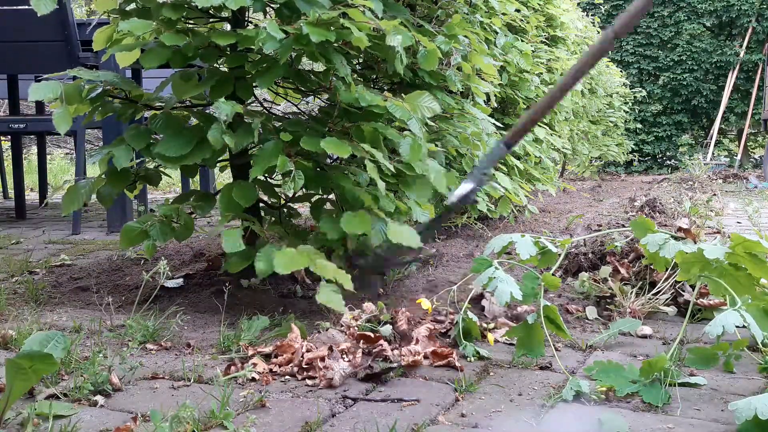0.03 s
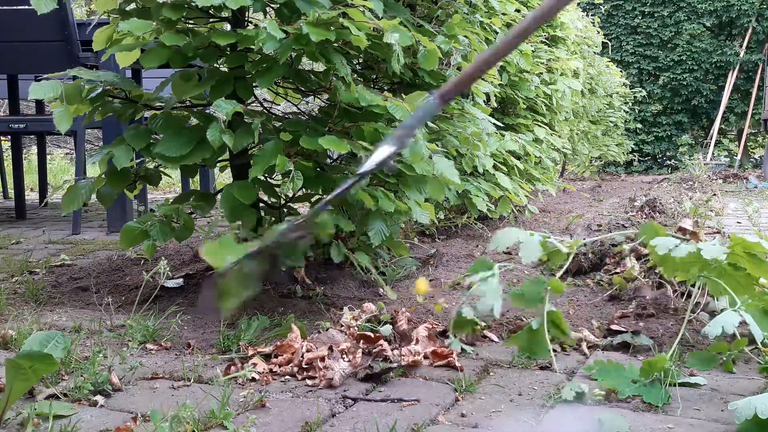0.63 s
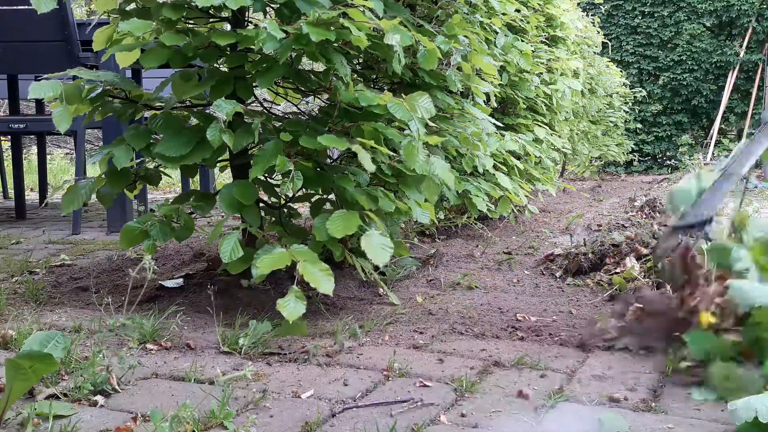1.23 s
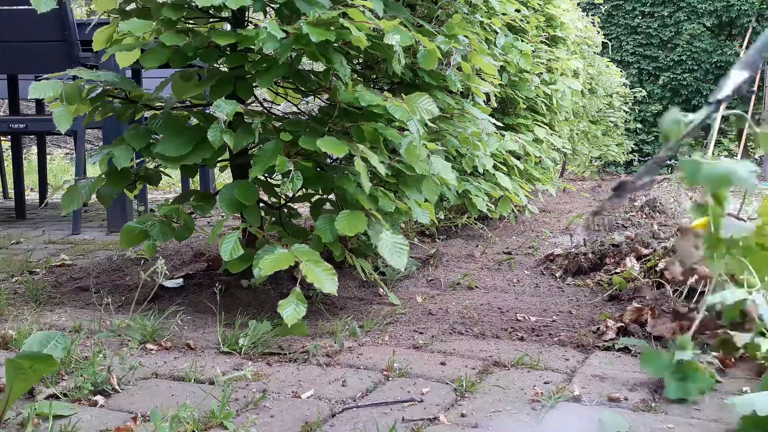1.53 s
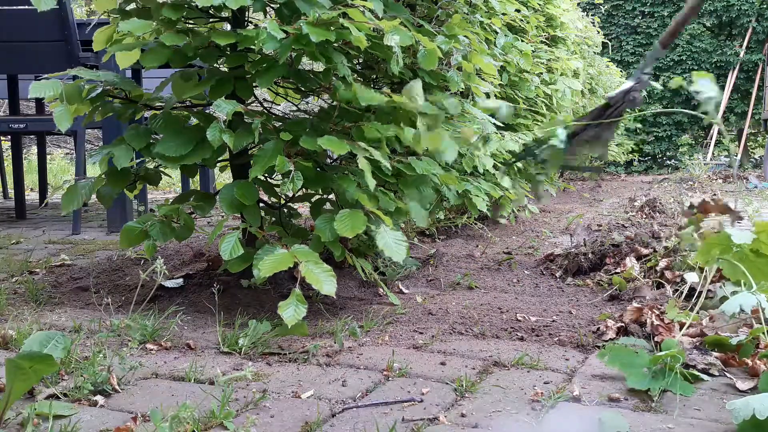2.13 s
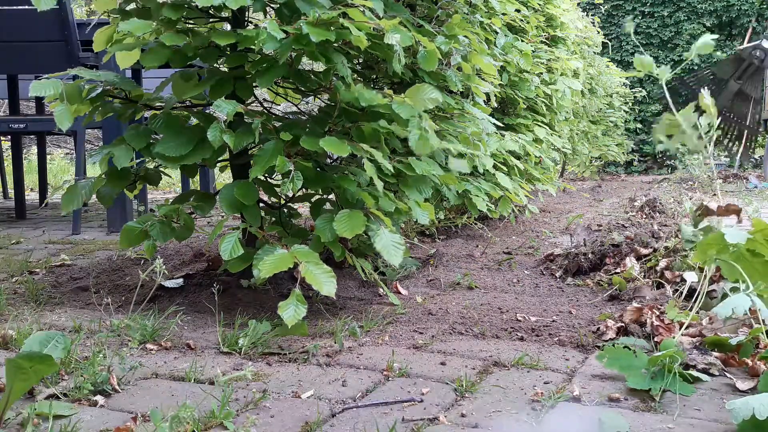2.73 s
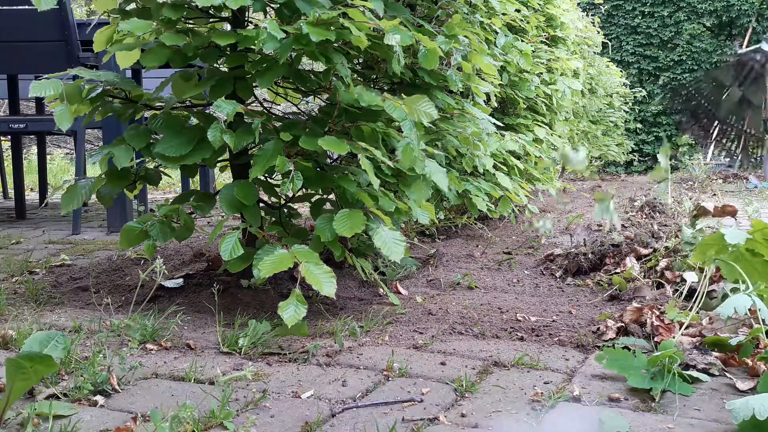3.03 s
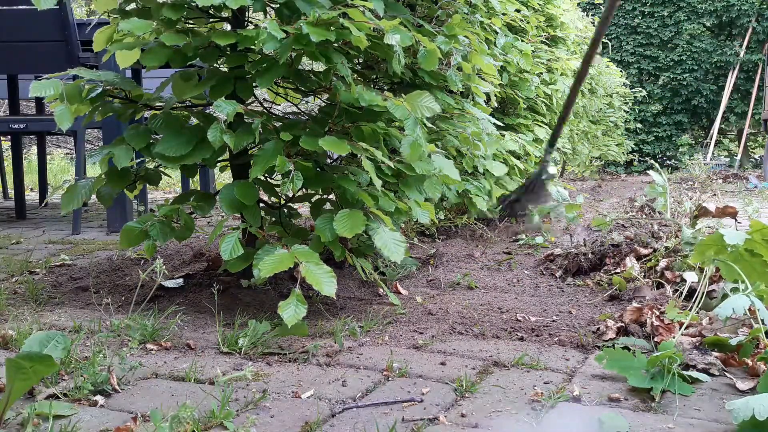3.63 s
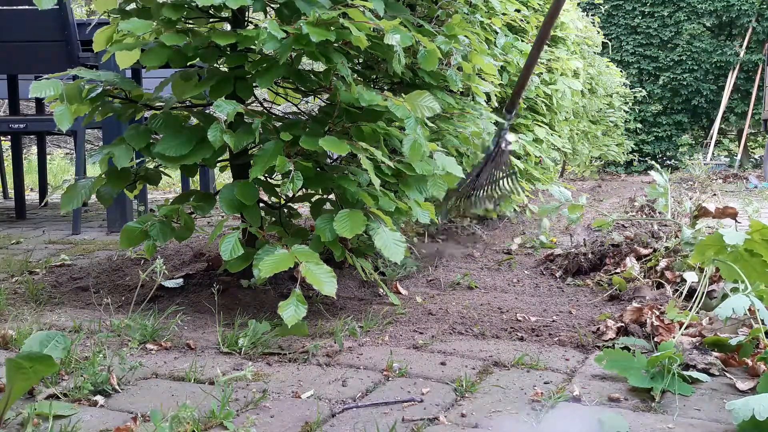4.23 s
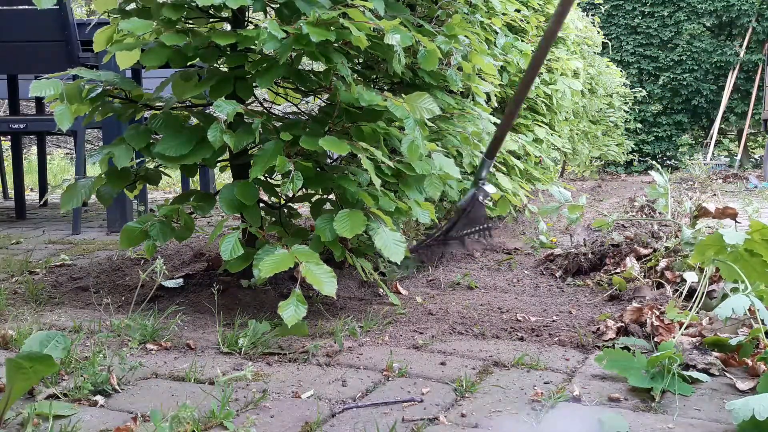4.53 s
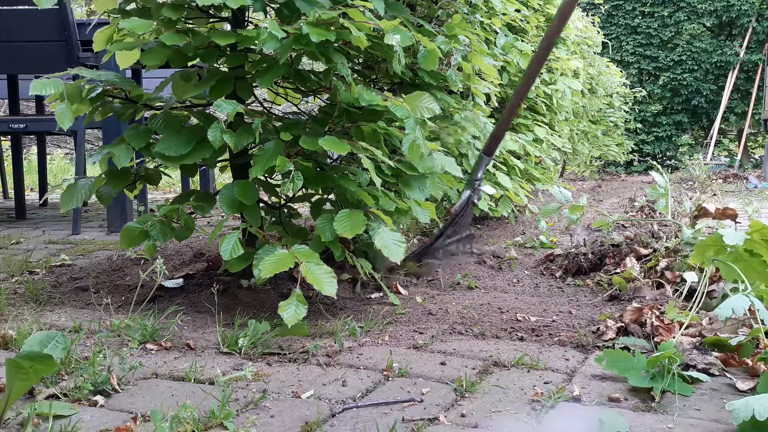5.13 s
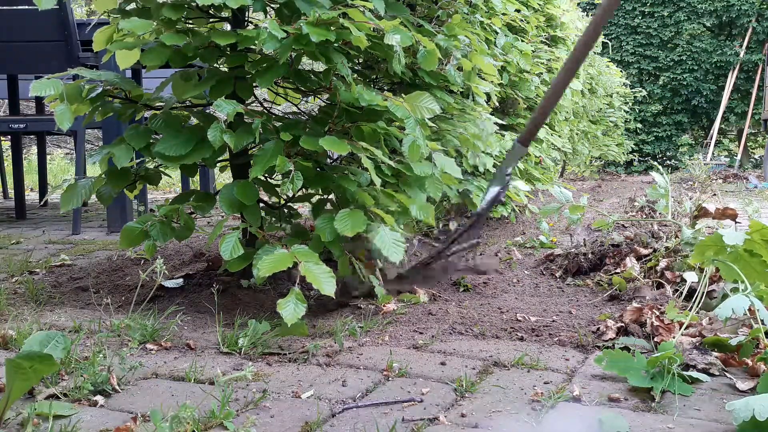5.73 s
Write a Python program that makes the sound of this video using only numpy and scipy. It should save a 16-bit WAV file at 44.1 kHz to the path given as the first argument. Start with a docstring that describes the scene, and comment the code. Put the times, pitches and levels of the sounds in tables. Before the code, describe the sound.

In a quiet garden, two close rake strokes drag through grit and dry leaves, the second the loudest, with the steel tines clattering. The raking rests for a couple of seconds while small birds chirp and whistle a little farther off. Then come quick, lighter scrapes, tine clicks, tiny twig snaps and a small knock as the birdsong thins out. A faint low rumble lies underneath.

```python
"""Raking a garden

A steel fan rake is pulled over soil and paving, close by and a little to the right. Stick-slip friction
excites the bending modes of its tines, while grit cracks and clods crumble in trains of small impulses.
Between strokes leaves rustle and settle. Small birds whistle and twitter from the hedges in
frequency-modulated tones, over a faint distant rumble."""
import sys
import numpy as np
from scipy import signal
from scipy.fft import rfft, irfft
from scipy.io import wavfile
from scipy.ndimage import uniform_filter1d

SR = 44100
rng = np.random.default_rng(int(sys.argv[2]) if len(sys.argv) > 2 else 0)


def to_wav(sig):
    """Store sig (one row per channel, or 1-D mono) as 16-bit WAV at the path in sys.argv[1].

    Samples outside -1..1 are clipped; the rate is SR.
    """
    pcm = np.clip(np.atleast_2d(sig), -1, 1) * 32767
    pcm = np.round(pcm).astype(np.int16)
    wavfile.write(sys.argv[1], SR, pcm.T)  # frames by channels


N = 259749
TIME = np.arange(N) / SR


def undb(db):
    """Amplitude ratio of a level in decibels."""
    return 10 ** (np.asarray(db) / 20)


def unit(x):
    """Normalisation to unit rms."""
    return x / np.sqrt(np.mean(x ** 2))


def band_unit(x, low_hz, high_hz):
    """Normalisation to unit rms within a pass band."""
    inside = signal.sosfilt(signal.butter(4, [low_hz, high_hz], "band", fs=SR, output="sos"), x)
    return x / np.sqrt(np.mean(inside ** 2))


def convolve(x, response):
    """Linear system: each channel is convolved with one impulse response."""
    return signal.oaconvolve(x, np.reshape(response, (1,) * (x.ndim - 1) + (-1,)), axes=-1)[..., :N]


def colour(x, spectrum, size=2048):
    """Minimum-phase filter through (f/Hz, level/dB) points, by folding the cepstrum."""
    hz, db = np.transpose(spectrum)
    grid = np.maximum(np.fft.rfftfreq(size, 1 / SR), 1)
    cepstrum = irfft(np.log(undb(np.interp(np.log(grid), np.log(hz), db))))
    cepstrum[1:size // 2] *= 2
    cepstrum[size // 2 + 1:] = 0
    return convolve(x, irfft(np.exp(rfft(cepstrum))))


def ring(x, hz, width_hz):
    """Damped resonator: an impulse response of unit energy whose bandwidth sets its decay."""
    t = TIME[:8192]
    response = np.exp(-np.pi * width_hz * t) * np.cos(2 * np.pi * hz * t)
    return convolve(x, response / np.linalg.norm(response))


def body(x, modes):
    """Modal superposition of (f/Hz, bandwidth/Hz, level/dB) resonances."""
    return sum(undb(db) * ring(x, hz, width) for hz, width, db in modes)


def wander(rate_hz):
    """Random modulation of unit rms: linear ramps between Gaussian values."""
    step = max(int(SR / rate_hz), 2)
    stairs = np.repeat(rng.standard_normal(N // step + 1), step)
    return unit(uniform_filter1d(stairs, step)[:N])


def clicks(per_s, spread_db):
    """Poisson process of impulses, many small and a few large."""
    hit = rng.random(N) < per_s / SR
    size = undb(spread_db * np.minimum(rng.exponential(size=N), 4))
    return unit(hit * size * rng.choice([-1, 1], N))


def bursts(events, decay_s):
    """Impact transients: exponentially decaying noise at each (t/s, level/dB)."""
    envelope = sum(undb(db) * (TIME >= s) * np.exp(-np.abs(TIME - s) / decay_s) for s, db in events)
    return rng.standard_normal(N) * envelope


def swell(start_s, attack_s, lift_s, release_s, bite_db=15, sag_db=2, fall_db=17):
    """Force envelope of a gesture: it builds up, sags while held and decays exponentially once lifted."""
    to_go = np.clip(1 - (TIME - start_s) / attack_s, 0, 1)
    held = np.clip((TIME - start_s - attack_s) / max(lift_s - start_s - attack_s, 1 / SR), 0, 1)
    released = np.maximum(TIME - lift_s, 0) / release_s
    return (TIME >= start_s) * undb(-bite_db * to_go ** 1.01 - sag_db * held - fall_db * released)


def ears(x, scatter_db, scatter_s, right_db=3.5, lag_s=.00009, spread_s=.00004):
    """Interaural time and level differences: each impulse has its own spot and spray of reflections."""
    at = np.flatnonzero(x)
    lag = np.round(SR * (lag_s + spread_s * rng.standard_normal(N)[at])).astype(int)
    left = np.bincount(np.clip(at + lag, 0, N - 1), x[at], N)
    decay = np.exp(-TIME[:4096] / scatter_s)
    spray = np.sqrt(np.abs(convolve(x ** 2, decay / decay.sum()))) * rng.standard_normal((2, N))
    both = (np.array([left, x]) + undb(scatter_db) * spray) / np.hypot(1, undb(scatter_db))
    return both * undb(right_db * np.array([[-.5], [.5]]))


def distant(x, pan_db, foliage_db, echo_db, t60_s, foliage_t60_s=0.049):
    """Multipath propagation: direct sound, scattering by foliage and reverberation from walls."""
    t = TIME[:SR]
    out = []
    for side, lag_samples in ((-1.35, 7), (1, 0)):
        smear = rng.standard_normal(SR) * undb(-60 * t / foliage_t60_s)
        tail = rng.standard_normal(SR) * undb(-60 * t / t60_s)
        early = smear * undb(foliage_db) / np.linalg.norm(smear)
        early[lag_samples] += 1
        response = early * undb(side * pan_db / 2) + tail * undb(echo_db) / np.linalg.norm(tail)
        out.append(convolve(x, response))
    return np.array(out)


def surroundings(x, echo_db, t60_s):
    """Early reflections from paving and stems colour each ear, anew at every spot."""
    t = TIME[:4096]
    tails = rng.standard_normal((2, len(t))) * undb(-60 * t / t60_s)
    tails = np.diff(tails, prepend=0)  # small things reflect mostly treble
    responses = tails * undb(echo_db) / np.linalg.norm(tails, axis=1, keepdims=True) + (t == 0)
    return np.array([convolve(ear, response) for ear, response in zip(x, responses)])


# spectrum of the open air: f/Hz, relative level/dB
AIR_SPECTRUM = [(15, -38.5), (25, -1.5), (86, 2.5), (142, -4), (286, -6.5), (344, -11), (475, -8),
                (573, -12.5), (1120, -13), (1670, -22.5), (3540, -21), (3930, -24.5), (4620, -25.5),
                (9020, -57.5), (15000, -40.5)]


def garden(level_db=-54, right_db=4.8):
    """Diffuse field of distant rumble and air: coherence between the ears falls with frequency."""
    mid, side = (colour(rng.standard_normal(N), AIR_SPECTRUM, size=16384) for _ in range(2))
    side = colour(side, [(70, -27), (160, -9.5), (400, -10), (1000, -3.0), (3000, 1)])
    both = (mid + side * np.array([[1], [-1]])) / np.std(mid)
    return both * undb(level_db + 0.32 * wander(4.84) + right_db * np.array([[-.5], [.5]]))


# repeats of one falling whistle: t/s, relative level/dB
WHISTLE_CALLS = [(1.435, -42.5), (1.935, -40.5), (2.442, -42), (2.95, -43), (3.467, -44)]
# its contour: t/s from the onset, f/Hz, relative level/dB
WHISTLE_CONTOUR = [(0, 3850, -7), (.03, 3555, 7.5), (0.071, 3305, -2.5), (.12, 3120, -8), (0.183, 2680, -2)]


def whistles(waver_hz=30):
    """A bird whistles a near-pure tone, whose phase is the integral of a falling frequency."""
    whistle = np.zeros(N)
    contour_s, contour_hz, contour_db = np.transpose(WHISTLE_CONTOUR)
    t = TIME[:int(contour_s[-1] * SR)]
    for s, db in WHISTLE_CALLS:
        hz = np.interp(t, contour_s, contour_hz) + waver_hz * wander(233)[:len(t)]
        gain = undb(db + np.interp(t, contour_s, contour_db)) * signal.windows.tukey(len(t), .15)
        whistle[int(s * SR):][:len(t)] += gain * np.sin(2 * np.pi * np.cumsum(hz) / SR)
    return distant(whistle * undb(-9), pan_db=15.2, foliage_db=-10, echo_db=0.66, t60_s=0.49)


def sing(notes, buzz_hz, rasp):
    """Frequency modulation of gliding tones by a periodic buzz and a random rasp."""
    voice = np.zeros(N)
    for s, length, start_hz, end_hz, db, depth_hz in notes:
        n = int(length * SR)
        shake = np.sin(2 * np.pi * buzz_hz * TIME[:n]) + rasp * wander(700)[:n]
        hz = np.linspace(start_hz, end_hz, n) + depth_hz * shake
        gain = undb(db) * signal.windows.tukey(n, .4)
        voice[int(s * SR):][:n] += gain * np.sin(2 * np.pi * np.cumsum(hz) / SR)
    return voice


# song notes: t/s, duration/s, start f/Hz, end f/Hz, relative level/dB, buzz deviation/Hz
SONG_NOTES = [ (0.291, 0.018, 6970, 6240, -41.5, 60), (0.329, .044, 6180, 6180, -52, 80),
              (0.454, 0.095, 5730, 4900, -45, 90), (.795, 0.023, 6000, 6660, -49.5, 200),
              (1.215, 0.12, 3200, 4170, -39.5, 70), (1.707, 0.054, 4750, 4680, -44.5, 55),
              (2.21, 0.071, 4680, 4750, -47.5, 200), (2.723, 0.071, 4970, 4650, -51.5, 170),
              (2.768, .045, 6700, 6300, -50.5, 252), (2.672, .012, 9300, 9600, -67, 250),
              (2.72, 0.0086, 9300, 9500, -66, 250), (2.758, 0.011, 9150, 8700, -61, 250),
              (2.941, 0.056, 5635, 5350, -42.5, 60.3), (3.124, 0.037, 4290, 4280, -38.5, 130),
              (3.242, 0.051, 4790, 4700, -48, 100), (4.11, .04, 3780, 3320, -70, 70.4),
              (4.149, 0.084, 3210, 3084, -56.5, 25), (4.293, 0.067, 3340, 3790, -61.5, 90),
              (4.387, 0.047, 2717, 2740, -55.5, 70), (4.849, 0.065, 3850, 3740, -58, 110),
              (4.98, 0.12, 3300, 3460, -61, 110), (5.404, 0.025, 3840, 3700, -56, 80)]


def song(pip_hz=4730, pip_every_s=.07):
    """Birds twitter in frequency-modulated glides and an even run of three soft pips."""
    pips = [(1.515 + k * pip_every_s, 0.025, pip_hz, pip_hz, -54.5, 110) for k in range(3)]
    voice = sing(SONG_NOTES + pips, buzz_hz=170, rasp=0.51) * undb(0.5)
    return distant(voice, pan_db=10.3, foliage_db=0, echo_db=-1.1, t60_s=0.41)


# chips that climb as the phrase goes on: t/s, centre f/Hz, relative level/dB
CHIP_CALLS = [(.51, 4500, -43.5), (0.593, 5350, -44), (.678, 5300, -43.5), (1.883, 5000, -41.5),
              (1.956, 5100, -44), (2.057, 5170, -40.5), (2.223, 5650, -43.5), (2.34, 5300, -40),
              (2.486, 6000, -48), (2.581, 6150, -49), (2.649, 6450, -53)]


def chips(length_s=.029, rise_hz=1380, depth_hz=594):
    """Raspy upward sweeps from a bird deep in the hedge, smeared by multiple scattering."""
    notes = [(s, length_s, hz - rise_hz / 2, hz + rise_hz / 2, db, depth_hz) for s, hz, db in CHIP_CALLS]
    voice = sing(notes, buzz_hz=138.6, rasp=1.0) * undb(-9.5)
    return distant(voice, pan_db=3.4, foliage_db=10.2, echo_db=4.1, t60_s=0.77, foliage_t60_s=0.2)


# spectrum of dry leaves and twigs: f/Hz, relative level/dB
LEAF_SPECTRUM = [(150, -0.5), (400, 9), (900, 9.5), (2200, 11), (3500, 8), (5000, 6.5), (7000, 6.5),
                 (8800, -1.5), (13000, 3), (16000, -2)]
# leaves stirred: t/s, rise/s, settling/s, peak band level/dB
LEAF_STIRS = [ (.28, 0.027, 0.31, -47), (.66, 0.082, 0.16, -59), (1.22, 0.095, 0.42, -48.5),
              (1.89, 0.026, 0.19, -61), (2.06, 0.025, 0.48, -63), (2.5, 0.26, 0.082, -64.5),
              (2.92, .035, 0.093, -66), (3.119, 0.026, 0.09, -72), (3.471, 0.082, 0.21, -62.5),
              (4.404, 0.029, 0.19, -59), (4.61, 0.034, 0.19, -53), (5.031, 0.076, 0.35, -53.5),
              (5.28, 0.059, 0.16, -57.5), (5.47, 0.11, 0.6, -57.5)]


def leaves(rest_db=-75.5):
    """Dry leaves brush in a fine crackle with stray ticks; incoherent rustles add in power."""
    crackle = ears(clicks(4000, 1.5) + 0.39 * clicks(160, 4.3), 0, 0.0028)
    rustle = band_unit(colour(crackle, LEAF_SPECTRUM), 11650, 14800)
    power = sum((undb(db) * swell(s, rise, s + rise, settle)) ** 2 for s, rise, settle, db in LEAF_STIRS)
    return rustle * np.sqrt(power + undb(rest_db) ** 2)


# twigs and crumbs breaking: t/s, relative level/dB
TWIG_SNAPS = [(1.7244, -46), (1.7848, -45), (2.4418, -53), (3.023, -49.5), (3.315, -56), (4.3016, -48),
              (4.6655, -39), (4.7251, -41)]


def snaps():
    """Brittle fracture: each twig or crumb gives one short broadband burst."""
    return undb(1) * colour(ears(bursts(TWIG_SNAPS, 0.0022), 0, 0.0067), LEAF_SPECTRUM)


# knock of the rake: t/s, relative level/dB
RAKE_KNOCKS = [(4.9475, -28.5)]
# its modes: f/Hz, bandwidth/Hz, relative level/dB
RAKE_MODES = [(960, 200, -13), (1830, 320, -6), (2180, 250, -13), (2740, 180, -12)]
# treble loss on soft soil: f/Hz, gain/dB
SOIL_CUSHION = [(3000, 1), (9000, -6)]


def knock():
    """An impact excites heavily damped modes of the rake; soft soil takes the edge off."""
    blow = ears(bursts(RAKE_KNOCKS, 0.0016), 2.5, 0.0041)
    return undb(-0.5) * colour(body(blow, RAKE_MODES), SOIL_CUSHION)


# a tine on a stone: t/s, duration/s, level/dB
STONE_RUBS = [(0.15, 0.054, -37.5), (0.313, 0.064, -46.5), (5.224, 0.012, -45)]


def squeals(hz=4340, width_hz=130):
    """Friction on a stone drives the second bending mode of a tine."""
    gain = np.zeros(N)
    for s, length, db in STONE_RUBS:
        n = int(length * SR)
        gain[int(s * SR):][:n] += undb(db) * signal.windows.tukey(n, .5)
    return gain * ring(ears(clicks(1500, 4.2), -6, .004), hz, width_hz)


# spectrum of crumbling clods: f/Hz, relative level/dB
SOIL_SPECTRUM = [(80, -42.5), (200, -10.5), (400, 3), (700, 4), (1200, 10.5), (1700, 2.5), (3000, 8),
                 (8000, -17)]


def soil():
    """Shot noise of crumbling clods, strongest in the middle frequencies."""
    return band_unit(colour(ears(clicks(1800, 2.7), -2, .008), SOIL_SPECTRUM), 350, 1400)


# spectrum of cracking grit: f/Hz, relative level/dB
GRIT_SPECTRUM = [(150, -54.5), (400, -15), (1200, -12.5), (3000, -0.5), (4500, -3), (5300, -7.5),
                 (7000, -0.5), (8800, -9), (11000, -7), (14000, -3.5), (16000, -14.5)]


def grit():
    """Dense, bright shot noise of grains cracking under the tines."""
    return band_unit(colour(ears(clicks(4500, 2.5), -2, .0015), GRIT_SPECTRUM), 8500, 16000)


# resonances shared by the whole fan: f/Hz, bandwidth/Hz, relative level/dB
FAN_RESONANCES = [(805, 70, -25.5), (1000, 250, -18), (1625, 100, -25), (2160, 300, -1.5),
                  (2720, 800, -7.5), (4240, 140, -5), (6420, 310, -17.5), (8700, 110, -13),
                  (13050, 1300, -17)]


def fan(force):
    """Forced vibration of the steel fan as one body."""
    return body(force, FAN_RESONANCES)


# main bending mode of each tine: f/Hz, weight/dB before compression
TINE_PITCHES = [(1911, -48), (2175, -40), (2379, -53.5), (2492, -55), (2654, -58), (2686, -70),
                (2907, -26.5), (3225, -13.5)]
# bending modes of one tine: ratio to its main mode, bandwidth/Hz, relative level/dB
BENDING_MODES = [(1, 42, 3), (1.92, 34.6, -7), (3.05, 38.4, -19.5), (5.3, 91.6, -8.5)]


def tines(bite_hz, slips_per_s=600, reach_hz=420):
    """Stick-slip excites each tine independently; those near the biting part of the fan ring loudest."""
    out, power = 0, 0
    for hz, db in TINE_PITCHES:
        share = undb(0.23 * db) / (1 + ((hz - bite_hz) / reach_hz) ** 2)
        slips = ears(clicks(slips_per_s, 6.5), -4.5, 0.0061)
        modes = [(ratio * hz, width, mode_db) for ratio, width, mode_db in BENDING_MODES]
        out = out + share * body(slips, modes)
        power = power + share ** 2
    return out / np.sqrt(power)


# tines landing or flicking free: t/s, relative level/dB, ring offset/dB
TINE_TAPS = [(0.101, -33, 6), (0.828, -21, -1), (0.8673, -12.5, -2), (1.8768, -50, 14),
             (3.6857, -15.5, -22), (4.4728, -19, 3.5), (5.049, -32.5, -16), (5.0694, -33, -6),
             (5.0815, -25, -7), (5.1368, -28, 3), (5.3221, -31.5, 3), (5.361, -36.5, 12),
             (5.655, -27.5, -4)]


def taps():
    """Impulsive excitation: a contact tick, then free vibration of the fan and its tines."""
    contact = bursts([(s, db) for s, db, _ in TINE_TAPS], 0.0026)
    tick = colour(ears(contact, 0, 0.0047), GRIT_SPECTRUM)
    blow = ears(bursts([(s, db + ring_db) for s, db, ring_db in TINE_TAPS], 0.0011), -1.5, 0.0064)
    steel = fan(blow) + body(blow, [(hz, 45, -8) for hz, _ in TINE_PITCHES])
    return undb(0.5) * tick + undb(-9.5) * steel


# pulls of the rake: start t/s, lift t/s, attack/s, release/s, relative level/dB, ring offset/dB,
# soil offset/dB, f/Hz of the tines that bite first, f/Hz of those that bite last
RAKE_PULLS = [ (0.103, 0.289, 0.07, 0.019, -32.5, -6, -8.5, 2310, 2500),
              (0.826, 1.191, 0.15, 0.069, -24.5, -5, -10.5, 2300, 2270),
              (3.682, 3.765, 0.021, 0.051, -32.5, -3.5, -14.5, 2400, 2180),
              (3.825, 4.003, 0.091, 0.05, -39.5, 0, -9.5, 2330, 2880),
              (4.47, 4.569, 0.074, 0.027, -35.5, 0.5, -13.5, 2930, 2700),
              (5.084, 5.105, 0.018, 0.0096, -37, -4, -11, 2800, 2780),
              (5.126, 5.145, 0.015, 0.022, -36.5, -3.5, -16, 2820, 2830),
              (5.268, 5.289, 0.015, 0.016, -31.5, -19, -9.5, 2740, 2800),
              (5.652, 5.73, 0.059, 0.14, -37.5, -5.5, -4.5, 2680, 2460),
              (5.802, 5.864, 0.037, 0.029, -33, -2.5, -10, 2400, 2530)]


def scrape(ring_on_s=0.017, crumble_on_s=0.042):
    """Sliding friction drives grit, steel and soil; the juddering drag modulates their amplitude."""
    bite_path = []
    for s, lift, *_, first_hz, last_hz in RAKE_PULLS:
        bite_path += [(s, first_hz), (lift, last_hz)]
    bite_hz = np.interp(TIME, *np.transpose(bite_path))
    judder = undb(0.97 * wander(75))
    cracking = grit()
    drag = ears(clicks(2000, 4.9), -3.5, 0.0032)
    steel = fan(drag) + undb(1.5) * tines(bite_hz)
    crumbling = soil()
    out = 0
    for s, lift, attack, release, db, ring_db, soil_db, *_ in RAKE_PULLS:
        stroke = (cracking * swell(s, attack, lift, release) * undb(-3)
                  + steel * swell(s, attack, lift, release + ring_on_s) * undb(ring_db - 2)
                  + crumbling * swell(s, attack, lift, release + crumble_on_s) * undb(soil_db - 3.5))
        out = out + surroundings(judder * stroke * undb(db), echo_db=-1.5, t60_s=.022)
    return out


def scene():
    """Superposition of rake, twigs, leaves, birds and air."""
    raking = scrape() + squeals() + taps() + snaps() + knock() + leaves()
    birds = whistles() + song() + chips()
    return raking + birds + garden()


def record(dry, low_cut_hz=50, top_hz=16050):
    """Band limiting: a gentle high-pass thins the deep bass and a steep low-pass cuts the top."""
    thin = signal.sosfilt(signal.butter(2, low_cut_hz, "high", fs=SR, output="sos"), dry)
    return signal.sosfilt(signal.ellip(10, .2, 75, top_hz, fs=SR, output="sos"), thin)


dry = scene()
out = record(dry)
to_wav(out)
```